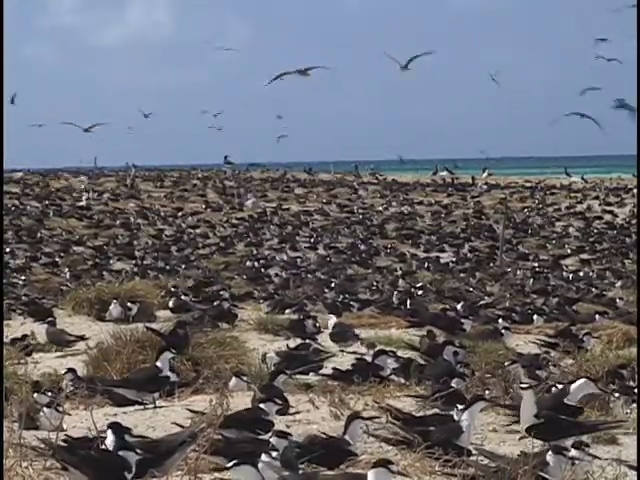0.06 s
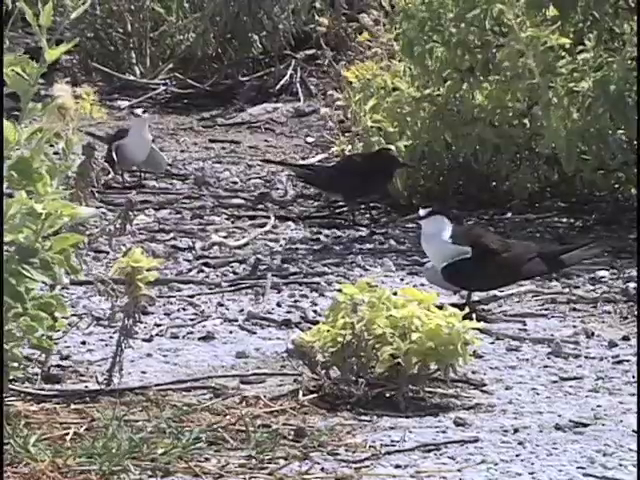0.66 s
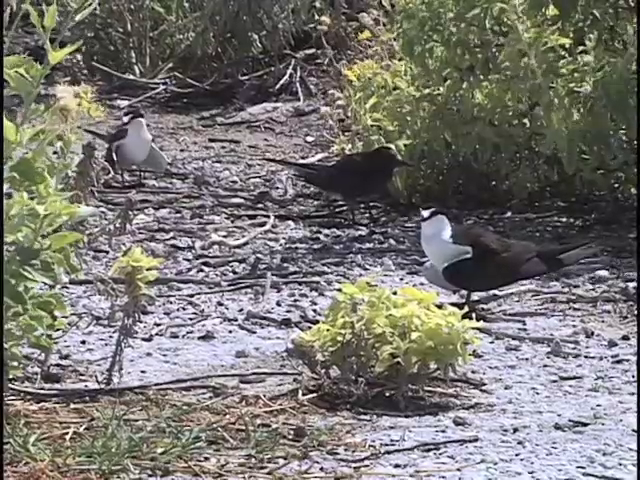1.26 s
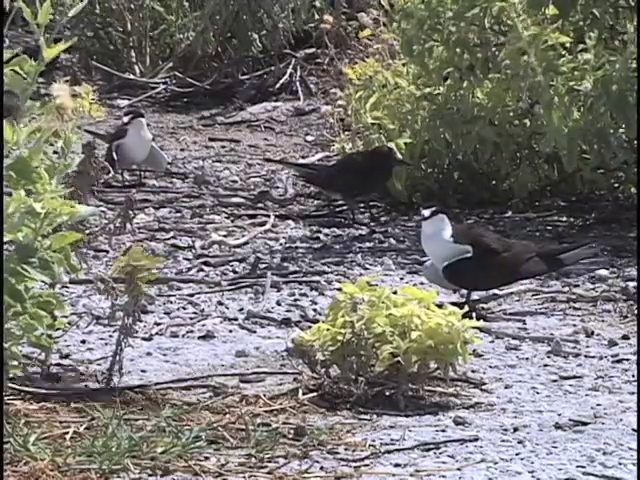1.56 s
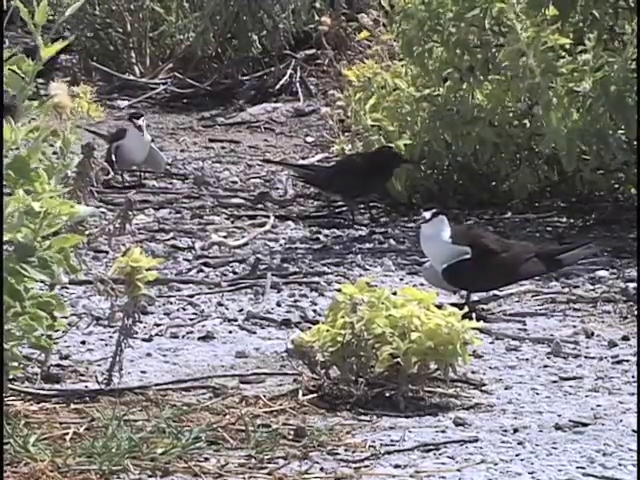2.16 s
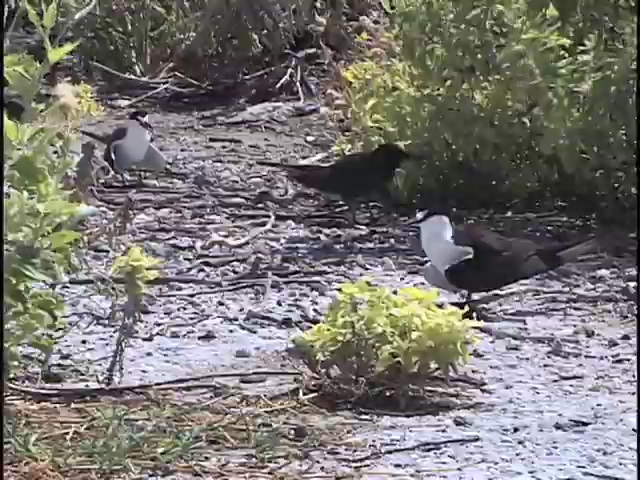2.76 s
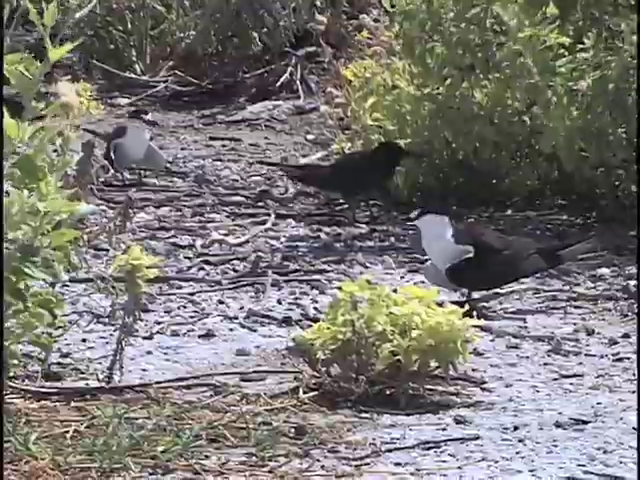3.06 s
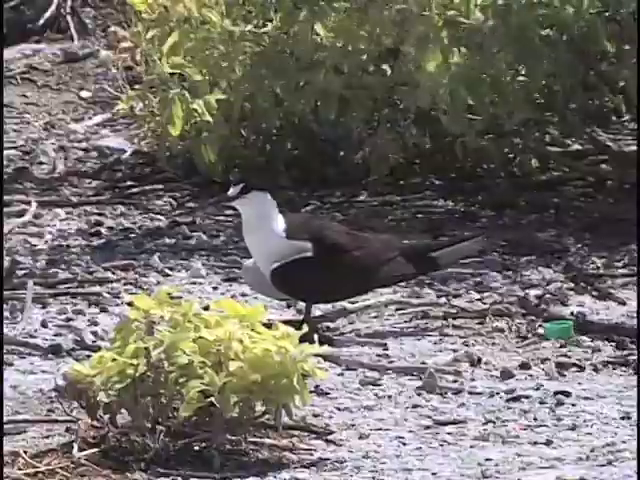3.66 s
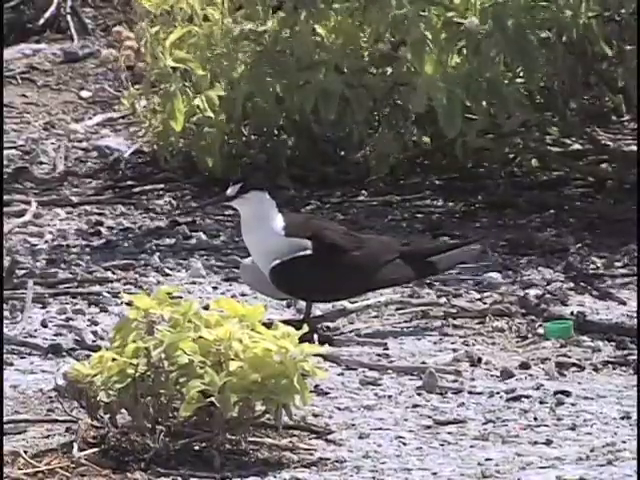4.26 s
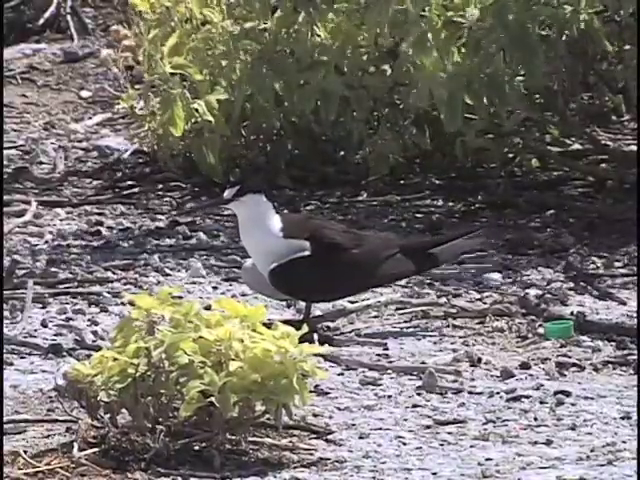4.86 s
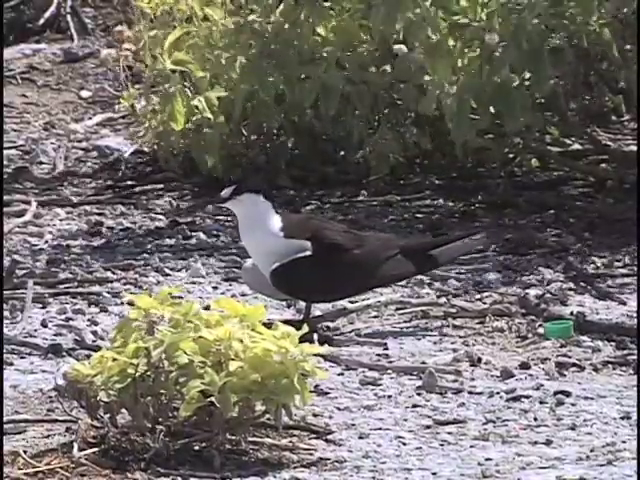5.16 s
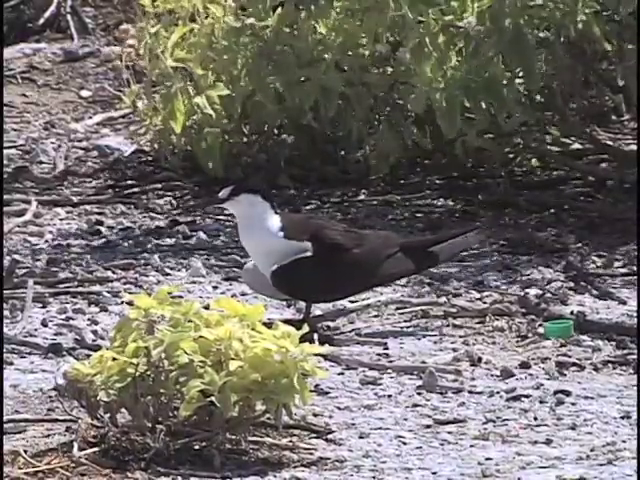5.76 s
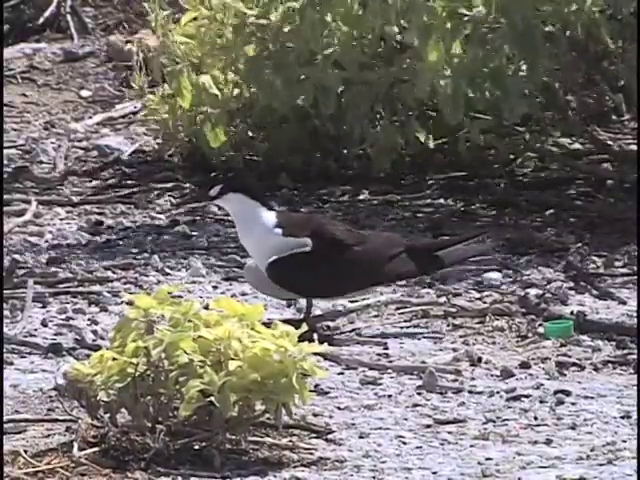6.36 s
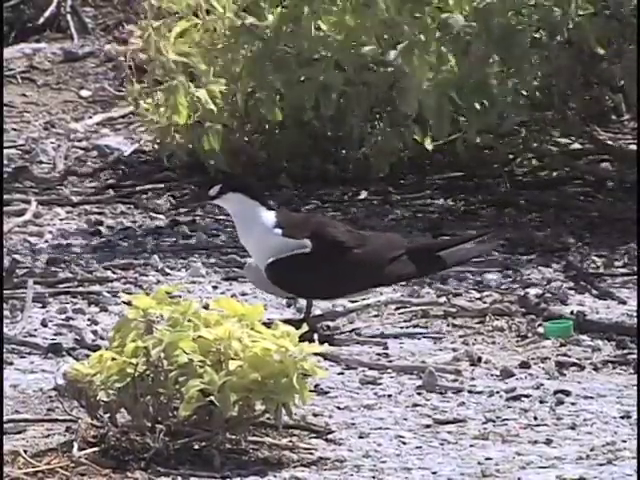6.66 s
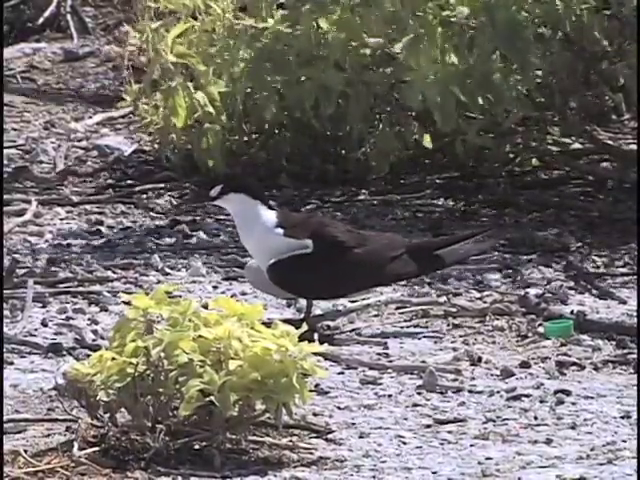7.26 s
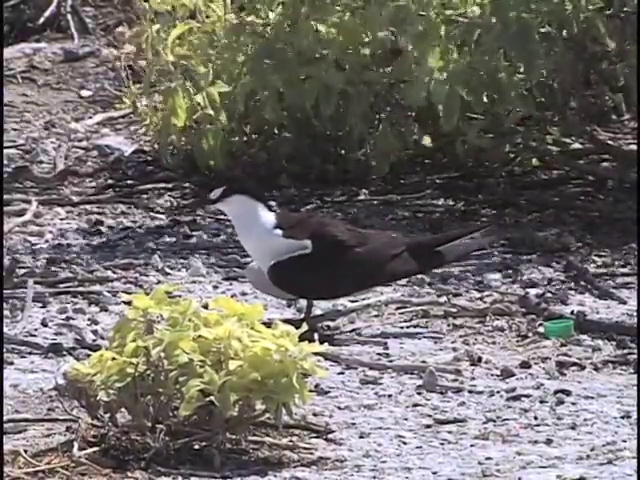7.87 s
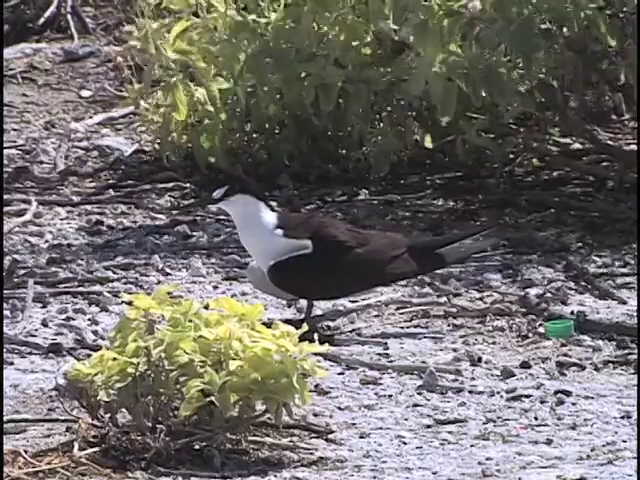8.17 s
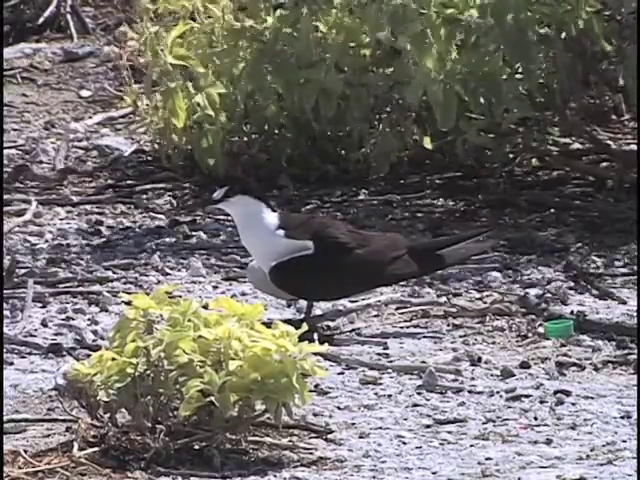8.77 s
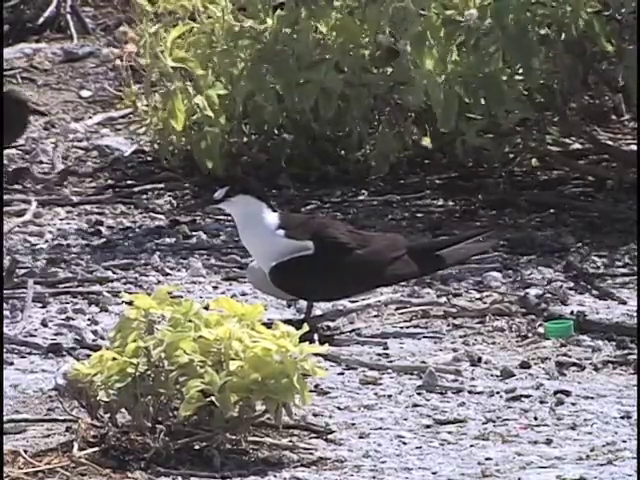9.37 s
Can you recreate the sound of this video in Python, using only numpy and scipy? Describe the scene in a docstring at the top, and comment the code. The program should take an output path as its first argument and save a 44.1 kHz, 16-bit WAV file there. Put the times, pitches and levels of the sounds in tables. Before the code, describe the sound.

Nasal, yodelling tern calls and a chick's peeps and squeals over a dense seabird colony din, with wind rumbling on the microphone.

```python
"""A tern colony on a windy beach. For the first third of a second the scene is among the packed nests, where
one bird growls; then the scene changes to a quieter spot by the bushes. Adults a few metres off trade nasal,
yodelling calls, a harmonic voice ringing in throat and beak. A chick peeps, then squeals at about 3 s. Behind
them hundreds of birds merge into a din that swells towards 8 s. Throughout, wind rumbles on the microphone over
faint, far surf."""
import sys
import numpy as np
from scipy import signal
from scipy.fft import rfft, irfft, next_fast_len
from scipy.io import wavfile
from scipy.ndimage import uniform_filter1d

SR = 44100
rng = np.random.default_rng(int(sys.argv[2]) if len(sys.argv) > 2 else 0)


def wav_out(sig):
    """Save sig, one row per channel (or a flat mono array), as 16-bit PCM at SR to the path in sys.argv[1]."""
    wavfile.write(sys.argv[1], SR, np.round(np.clip(np.atleast_2d(sig).T, -1, 1) * 32767).astype(np.int16))


N = 419391
TIME = np.arange(N) / SR
SCENE_CHANGE_S = .35  # the scene changes from the nests to the bushes
TOP_HZ = 15000
EDGE_S = .006  # half the time a yelp takes to open or close

# Syllable shapes by call kind and part: share of syllable, pitch ratio, level/dB, throat ratio
SYLLABLES = { "yodel opening": [(0, .85, -7, 1), (.17, .75, -4.5, 0.86), (.27, .81, -12.5, 1.04),
             (.37, 1.01, -5.5, 0.8), (.46, 1, -7, 0.96), (.52, .91, 1, 1.36), (.65, .91, -1, 1.24),
             (.75, 1.2, -1, 1.07), (.92, 1.3, 1.5, 1.06), (1, 1.7, -10, 0.94)],
             "yodel middle": [(0, 1.28, 8, 1.11), (.13, 1.15, -1.5, 0.96), (.27, .87, -4.5, 0.98),
             (.42, 1, -7.5, 0.87), (.68, 1.04, 0, .95), (.8, 1.21, -0.5, 1.07), (1, 1.4, -0.5, 0.9)],
             "yodel closing": [(0, 1.23, 3, 1), (.16, 1.13, -0.5, .95), (.32, .88, -2, .93),
             (.6, .94, -4, .93), (.8, .97, -1, .93), (1, 0.57, -11, 0.63)],
             "swoop opening": [(0, .88, -5.5, 0.71), (.29, 1.27, -1.5, 0.86), (.4, .92, -1, 0.93),
             (.72, 1.08, 2, 1.07), (1, 1.27, 0, 1.07)], "swoop closing": [(0, 1.3, 4, 1.2),
             (.14, 1.15, 3, 1.05), (.34, 1, -1, 0.68), (.56, 1.22, -0.5, 0.91), (.74, 1.1, 0, .88),
             (1, 1.22, 0, 0.98)], "wail opening": [(0, .9, -0.5, 0.78), (.17, 1.19, -1, 0.83),
             (.3, 1.28, 2, 1), (.37, 1.22, 0.5, 0.94), (.44, 1, -1.5, 1.07), (.68, 1, 0.5, 0.99),
             (.86, 1.1, -1, 0.98), (1, 1.4, 1.5, 0.96)], "wail middle": [(0, 1.32, 13, 1.03),
             (.2, 1.2, 6, 0.93), (.34, 1.09, -10, .9), (.5, 1.15, -11, 1), (.72, 1.04, 2.5, 0.98),
             (1, 1.4, -8, 0.96)], "wail closing": [(0, 1.34, 3, 1.03), (.17, 1.2, -1, .97),
             (.32, 1.08, -3.5, 0.85), (.52, 1.21, 0, 0.96), (.73, 1.23, -1.5, 0.83), (1, 0.54, -2.5, 0.84)]}
# Adult timbres by name: chest/dB, throat ring/dB, nasal ring/dB, top/dB, rasp
VOICES = {"mellow": (-9, 18, -6.5, -9, .03), "clear": (3, 15, 6.5, -3, -0.05),
          "harsh": (-6.5, 9.5, 0, -0.5, .18), "thin": (-6.5, 15.5, 3, 4.5, 0.35),
          "nasal": (-5, 11.5, 4, 1, .16)}
# Near calls: kind, voice, start t/s, syllable ends t/s, pitch f/Hz, pitch ratio per syllable,
# base level/dB, throat resonance f/Hz
CALLS = [ ("wail", "nasal", .338, (.517, 0.608), 690, 0.93, -21, 2510),
         ("wail", "mellow", 0.72, (.937, 1.098, 1.21), 668, 0.99, -36, 2300),
         ("wail", "mellow", 1.912, (2.198, 2.353), 590, 1.01, -27.5, 2200),
         ("swoop", "mellow", 2.485, (2.675, 2.842), 568, 0.93, -31.5, 2330),
         ("wail", "mellow", 2.9, (3.04, 3.22), 620, 0.91, -31, 2820), ("swoop", "mellow", 3.822, (4.02,),
         572, 1, -27.5, 2320), ("wail", "nasal", 4.018, (4.24, 4.45), 760, .85, -28, 2760),
         ("wail", "harsh", 4.8, (5.0, 5.08), 660, 0.71, -27, 3070),
         ("yodel", "clear", 5.668, (5.858, 6.022, 6.085), 755, 0.97, -24.5, 2800),
         ("yodel", "clear", 6.772, (6.967, 7.141, 7.262), 738, 0.97, -24, 2670),
         ("wail", "harsh", 7.495, (7.672, 7.77), 700, 0.94, -23.5, 2820),
         ("yodel", "clear", 8.114, (8.312, 8.482, 8.565), 705, .98, -28, 2745),
         ("swoop", "mellow", 8.585, (8.79, 8.96), 550, 0.95, -29.5, 2260),
         ("wail", "clear", 8.712, (8.912, 8.997), 785, 0.98, -32, 2490)]


def tern_calls(fade_db=-1, swell_s=.012, taper_s=.03, snap_s=.003, break_s=.012):
    """Adults a few metres off: the voice sweeps, breaks and drops back in, weaker with each syllable."""
    out = np.zeros(N)
    for kind, voice, start, ends, pitch_hz, step, db, throat_hz in CALLS:
        for i, end in enumerate(ends):
            part = "opening" if i == 0 else "closing" if i == len(ends) - 1 else "middle"
            attack_s = swell_s if part == "opening" else snap_s
            release_s = taper_s if part == "closing" else snap_s
            note = syllable(SYLLABLES[kind + " " + part], end - start, pitch_hz * step ** i,
                            throat_hz, VOICES[voice], attack_s, release_s)
            add(out, start, undb(db + fade_db * i) * note)
            start = end + break_s
    return out


def syllable(shape, length, pitch_hz, throat_hz, voice_kind, attack_s, release_s):
    """One stretch of a call; the voice turns raspier where the pitch falls steeply."""
    t = np.arange(0, length, 1 / SR)
    share, *columns = np.transpose(shape)
    pitch, db, throat = (uniform_filter1d(np.interp(t / length, share, column), 400, mode="nearest")
                         for column in columns)
    falling = np.clip(-np.gradient(np.log(pitch)) * SR / 10, 0, 1)
    *timbre, rasp = voice_kind
    note = tern_note(pitch_hz * pitch, throat_hz * throat, [*timbre, rasp * (1 + falling)])
    return note * undb(db) * np.clip(np.minimum(t / attack_s, (length - t) / release_s), 0, 1)


# Spectrum of an adult's beak: f/Hz, level/dB
BEAK = [(450, -23), (750, -9), (1300, -7), (1700, -7), (2200, -5), (2900, -3.5), (3900, -7.5), (5200, -9),
        (7500, -16.5), (10000, -29.5), (14000, -43)]


def tern_note(hz, throat_hz, voice_kind, harmonics=20, throat_width_hz=430, nasal_hz=4800):
    """A harmonic stack through throat and beak; rasp shakes its pitch and strength."""
    chest_db, ring_db, nasal_db, top_db, rasp = voice_kind
    n = len(hz)
    hz = hz * (1 + .0059 * wander(n, 110.1) + (.0038 + .043 * rasp) * wander(n, 1100))
    phase = 2 * np.pi * np.cumsum(hz) / SR
    timbre = [(1400, chest_db), (2100, 0), (3300, 0), (nasal_hz, nasal_db), (6500, top_db)]
    voice, power = np.zeros(n), np.zeros(n)
    for k in range(1, harmonics + 1):
        throat = 1 + undb(ring_db) / (1 + (2 * (k * hz - throat_hz) / throat_width_hz) ** 2)
        flutter = undb(min(.6 * k, 4) * wander(n, 45))
        gain = response(BEAK, k * hz) * response(timbre, k * hz) * throat * flutter * (k * hz < TOP_HZ)
        voice += gain * np.sin(k * phase + np.pi * rng.random())
        power += gain ** 2
    voice = unit(voice / power ** .3)  # only a mild swell as a harmonic crosses the resonance
    hiss = unit(noise(n, BEAK) * (1 + np.cos(phase)))  # air passes the syrinx once a cycle
    voice = voice * (1 + rasp * wander(n, 500)) + (.03 + .6 * rasp) * hiss
    air_push = undb(1.65 * wander(n, 68.8))
    return unit(voice * air_push)


# Rise of a yelp: pitch ratio at start, middle, end
YELP_RISE = (0.95, 0.99, 1.07)
# Near yelps: start t/s, length/s, pitch f/Hz, bend (under 1 arches, over 1 sags), level/dB, throat f/Hz
YELPS = [(0.127, .11, 681, 1, -30.5, 2730), (1.247, 0.046, 661, .98, -35.5, 2650),
         (1.417, 0.087, 625, 1.1, -40.5, 2600), (4.03, 0.12, 975, .8, -26.5, 2800),
         (4.121, .051, 662, 1.09, -28, 2060), (4.753, 0.062, 893, .96, -29.5, 2840),
         (6.071, .094, 600, 1, -34, 2340), (6.192, 0.077, 860, .91, -31.5, 2450),
         (6.268, 0.097, 702, 1.18, -29, 2470), (6.38, 0.075, 765, 1.07, -33, 2720),
         (6.524, 0.052, 920, .98, -31, 2760), (7.784, .089, 700, 1.04, -26.5, 3100),
         (7.879, 0.13, 713, 1.08, -34, 2210), (8.049, .07, 697, 1.15, -33, 2400),
         (8.993, .12, 507, 1.12, -38, 2260), (9.269, 0.12, 731, 1, -32.5, 2580),
         (9.417, 0.12, 650, 1.06, -30.5, 2700)]


def tern_yelps():
    """Other adults near the microphone put in single, thin, rising yelps."""
    out = np.zeros(N)
    for start, length, pitch_hz, bend, db, throat_hz in YELPS:
        pitches = pitch_hz * np.array(YELP_RISE) * [bend, 1, bend]
        add(out, start - EDGE_S, undb(db) * yelp(length, pitches, throat_hz, VOICES["thin"]))
    return out


def yelp(length, pitches, throat_hz, voice_kind):
    """One gliding note, swelling in the middle; the throat resonance rides with the pitch."""
    hz, envelope = glide(length, pitches, EDGE_S)
    swell = undb(3 * np.sin(np.linspace(0, np.pi, len(hz))))
    return unit(tern_note(hz, throat_hz * np.sqrt(hz / hz.mean()), voice_kind) * swell) * envelope


# Bouts of begging: first peep t/s, last peep t/s, top pitch f/Hz, level/dB
PEEP_BOUTS = [(0.716, 2.634, 2004, -36), (3.414, 3.758, 1977, -39), (4.502, 4.644, 2000, -37.5),
              (5.049, 5.189, 1905, -37), (5.322, 5.457, 1940, -38.5), (8.18, 8.365, 2110, -38),
              (9.03, 9.193, 2060, -33.5)]


def chick_peeps(interval_s=.175, length_s=.038):
    """A nearby chick begs in evenly spaced, arched peeps, strongest in the second harmonic."""
    out = np.zeros(N)
    partials = [(1, 2), (2, 11), (3, 6.5), (4, -.5), (5, -8), (6, -16)]
    for first, last, hz, db in PEEP_BOUTS:
        for start in np.linspace(first, last, round((last - first) / interval_s) + 1):
            arch = np.array([.92, 1, .89]) + .012 * rng.standard_normal(3)
            note = chick_note(length_s, hz * arch, partials, edge_s=.007, shake=.013, buzz=.12)
            add(out, start, undb(db) * note * np.hanning(len(note)) ** .5)
    return out


# Droop of a whistle: tone ratio at start, middle, end
WHISTLE_DROOP = (1.025, 1, 0.98)
# Chick whistles: start t/s, length/s, tone f/Hz, level/dB
WHISTLES = [(1.642, 0.021, 3340, -34), (3.313, 0.17, 3900, -42.5), (4.049, 0.079, 4760, -39),
            (6.239, 0.075, 4730, -34), (6.413, 0.046, 4900, -35), (6.587, 0.035, 4620, -35.5),
            (6.715, 0.073, 4240, -31), (7.264, 0.071, 3450, -33.5), (7.342, 0.064, 2986, -33.5),
            (7.453, 0.063, 3410, -29.5), (8.132, 0.112, 3323, -29), (8.687, 0.043, 4680, -29.5),
            (8.865, 0.035, 4450, -29.5)]


def chick_whistles():
    """Soft whistles that all droop alike."""
    out = np.zeros(N)
    for start, length, hz, db in WHISTLES:
        add(out, start, undb(db) * whistle(length, hz * np.array(WHISTLE_DROOP), buzz=.3))
    return out


# The chick's high register: on flipping up f/Hz, settled f/Hz
HIGH_REGISTER_HZ = (4540, 4370)
# Squeals: start t/s, low register length/s, high register length/s, starting f/Hz, base level/dB
SQUEALS = [(2.84, 0.056, 0.0023, 2850, -17), (2.908, 0.026, 0.051, 3560, -17), (2.985, 0.03, 0, 3750, -18),
           (3.048, .046, 0.041, 3540, -17), (3.163, .012, 0.03, 3600, -20.5)]


def chick_squeals(low_hz=3420, scoop_db_per_hz=.02, flick_after_s=.0314, flick_hz_per_s=22600):
    """Loud, buzzing squeals settle on the low register and may flip to the high one."""
    out = np.zeros(N)
    for start, low_s, high_s, first_hz, db in SQUEALS:
        scoop_db = scoop_db_per_hz * min(first_hz - low_hz, 0)  # a start below the register is soft
        settling = low_hz + (first_hz - low_hz) * np.array([1, .25, 0])
        note = whistle(low_s, settling, buzz=.5)
        add(out, start - .003, undb(db + np.linspace(scoop_db, 0, len(note))) * note)
        if high_s > EDGE_S:
            # a long high note ends in an upward flick
            last_hz = HIGH_REGISTER_HZ[1] + flick_hz_per_s * (high_s - flick_after_s)
            note = whistle(high_s, [*HIGH_REGISTER_HZ, last_hz], buzz=.5)
            add(out, start + low_s - .003, undb(db + np.linspace(2, -4, len(note))) * note)
    return out


def whistle(length, pitches, buzz, break_hz=3900):
    """A chick's tone; above the register break it gains half harmonics."""
    low = [(1, 0), (2, -21), (3, -34)]
    high = [(.5, -29), (1, 2), (1.5, -18), (2, -17.5), (2.5, -32.5), (3, -43)]
    partials = high if pitches[1] > break_hz else low
    return chick_note(length, pitches, partials, edge_s=.003, shake=.01, buzz=buzz)


def chick_note(length, pitches, partials, edge_s, shake, buzz, buzz_hz=720):
    """A thin tone of partials (multiple, level/dB); the other side of the syrinx buzzes against it."""
    hz, envelope = glide(length, pitches, edge_s)
    n = len(hz)
    strain = .3 + np.linspace(-1, 1, n) ** 4  # least steady at both ends
    phase = 2 * np.pi * np.cumsum(hz * (1 + shake * strain * wander(n, 2427))) / SR
    tone = unit(sum(undb(db + 2 * wander(n, 56)) * np.sin(k * phase) for k, db in partials))
    other_side = np.sin(2 * np.pi * np.cumsum(buzz_hz * (1 + .104 * wander(n, 315))) / SR)
    rasp = noise(n, [(1200, -22), (2400, -1), (4000, 0), (7500, -10), (10000, -25), (14000, -42)])
    return unit(tone * (1 + buzz * strain * other_side) + .8 * buzz * np.sqrt(strain) * rasp) * envelope


# Course of the growl: t/s, tone f/Hz, level/dB
GROWL = [(0, 515, -44), (.1, 550, -39), (.22, 652.2, -37), (.26, 481, -41), (.31, 491, -35),
         (.35, 548, -34.5)]


def growl(throb_hz=58, shake=.11):
    """One bird among the nests: a low, hoarse tone broken into throbs, gone when the scene changes."""
    phase = 2 * np.pi * np.cumsum(curve(GROWL) * (1 + shake * wander(N, 400))) / SR
    throb = 1 + .73 * np.cos(2 * np.pi * np.cumsum(throb_hz * (1 + .22 * wander(N, 37.9))) / SR)
    at_nests = np.clip((SCENE_CHANGE_S - TIME) / .004, 0, 1)
    return np.sin(phase) * throb * undb(curve(GROWL, column=2)) * at_nests


def ground_scatter(birds, t60_s=.28, tail_db=-14):
    """Ground and bushes throw a short, thin tail back to the microphone."""
    t = TIME[:SR // 2]
    tail = rng.standard_normal(len(t)) * undb(-60 * t / t60_s) * (t > .004)
    return birds + undb(tail_db) * signal.fftconvolve(birds, tail / np.linalg.norm(tail))[:N]


def far_terns(count=260, variants=64, pitch_hz=710, throat_hz=2650):
    """Further adults yelp at random times and distances, the further ones quieter."""
    far_voice = (-8, 11, -3, -3, .09)  # columns as in VOICES
    notes = [yelp(.04 + .06 * rng.random(), pitch_hz * np.exp(.13 * z[0] + .1 * z[1:4]),
                  throat_hz * np.exp(.14 * z[4]), far_voice)
             for z in rng.standard_normal((variants, 5))]
    out = np.zeros(N)
    for i, (lag, distance) in enumerate(rng.random((count, 2))):
        note = notes[i % variants]
        start = (i + 2 * lag - 2) / count * N / SR
        add(out, start, undb(-10 * distance) * note * np.hanning(len(note)) ** .5)
    return unit(out)


# The din as it reaches the bushes: t/s, base level/dB
DIN_LEVEL = [(.6, -33), (2.4, -32.5), (3.4, -31.5), (4.2, -29.5), (4.6, -33), (5.4, -29), (6.4, -27.5),
             (7.7, -26.5), (8.5, -30), (9.5, -29.5)]
# Spectrum of hundreds of merged voices: f/Hz, level/dB
DIN_SPECTRUM = [(200, -21), (400, -21.5), (800, -16.5), (1250, -19.5), (1650, -9), (2100, -2), (2800, -0.5),
                (3900, -10), (5500, -18.5), (8000, -29.5), (10000, -40), (13000, -39), (15000, -69)]


def colony(nests_db=-28.5, nests_blur_db=4.5, voices_db=-3.5, blur_db=-9):
    """Far voices over the blur of all the rest, which is thicker among the packed nests."""
    at_nests = TIME < SCENE_CHANGE_S
    blur = noise(N, DIN_SPECTRUM) * undb(1.7 * wander(N, 16) + nests_blur_db * at_nests)
    level_db = np.where(at_nests, nests_db, curve(DIN_LEVEL))
    return undb(level_db) * (undb(voices_db) * far_terns() + undb(blur_db) * blur)


# Gusts at the microphone: t/s, base level/dB
GUSTS = [(0, -43), (.8, -44), (2.4, -43.5), (3.1, -39.5), (3.28, -32.5), (3.45, -41), (4.85, -42),
         (5.2, -34), (5.65, -42), (6.7, -35.5), (7.7, -36.5), (8.2, -40), (9.5, -44.5)]
# Spectrum of their rumble: f/Hz, level/dB
RUMBLE_SPECTRUM = [(20, -10), (45, 2), (80, 1.5), (130, -3.5), (200, -13.5), (320, -21), (700, -59)]


def wind(buffet_db=2.5, trim_db=-1, flutter_db=-13):
    """Eddies buffet the microphone; the stronger gusts shed smaller, higher-pitched ones."""
    gust = undb(curve(GUSTS) + trim_db + buffet_db * wander(N, 22))
    rumble = noise(N, RUMBLE_SPECTRUM)
    flutter = noise(N, [(60, -12), (180, 2.5), (400, -17), (1500, -58)])
    return gust * (rumble + undb(flutter_db) * np.sqrt(unit(gust)) * flutter)


def surf(level_db=-59.5):
    """A dull, steady wash from the far shore."""
    wash = noise(N, [(100, -10.5), (300, -.5), (500, -.5), (1000, -11.5), (3000, -39)])
    return undb(level_db + wander(N, .74)) * wash


def glide(length, pitches, edge_s):
    """Pitch arc through three points and a soft envelope; both overhang the note by edge_s."""
    t = np.arange(-edge_s, length + edge_s, 1 / SR)
    hz = np.polyval(np.polyfit([0, .5, 1], pitches, 2), np.clip(t / length, -.1, 1.1))
    opening = np.clip((np.minimum(t, length - t) + edge_s) / (2 * edge_s), 0, 1)
    return hz, np.sin(np.pi / 2 * opening) ** 2


def undb(db):
    """Decibels to gain."""
    return 10 ** (np.asarray(db) / 20)


def unit(x):
    """Scale to rms 1."""
    return x / np.sqrt(np.mean(x ** 2) + 1e-18)


def curve(rows, column=1):
    """One column of a time table at every sample."""
    rows = np.array(rows)
    return np.interp(TIME, rows[:, 0], rows[:, column])


def response(spectrum, hz):
    """Gain of a spectrum (f/Hz, level/dB) at any frequency."""
    f, db = np.transpose(spectrum)
    return undb(np.interp(np.log(hz + 1), np.log(f), db))


def noise(n, spectrum):
    """Noise of rms 1 with a spectrum (f/Hz, level/dB)."""
    size = next_fast_len(n)
    gain = response(spectrum, np.arange(size // 2 + 1) * SR / size)
    return unit(irfft(rfft(rng.standard_normal(n), size) * gain, size)[:n])


def wander(n, rate):
    """Random drift of spread near 1 that turns rate times a second."""
    place = np.arange(n) * rate / SR + rng.random()
    points = np.random.default_rng(rng.integers(2 ** 31)).standard_normal(int(place[-1]) + 2)
    return np.sqrt(3 / 2) * np.interp(place, np.arange(len(points)), points)


def add(out, start, x):
    """Mix a sound in at start seconds."""
    i = int(start * SR)
    a, b = max(i, 0), min(i + len(x), N)
    if b > a:
        out[a:b] += x[a - i:b - i]


def scene():
    """One microphone on the beach: near birds in front, colony and surf behind, wind on top."""
    near_birds = tern_calls() + tern_yelps() + chick_peeps() + chick_whistles() + chick_squeals()
    return (ground_scatter(near_birds + growl()) + colony() + surf() + wind())[None]


def record(dry):
    """The camera cuts the treble above TOP_HZ."""
    return signal.sosfilt(signal.ellip(8, .2, 70, TOP_HZ, fs=SR, output="sos"), dry)


dry = scene()
out = record(dry)
wav_out(out)
```